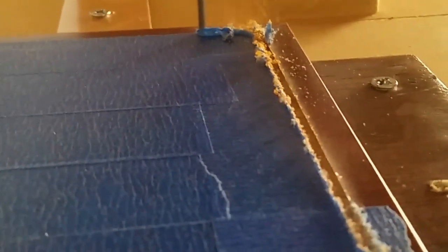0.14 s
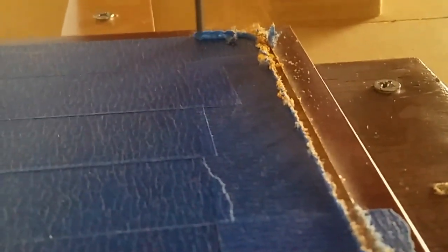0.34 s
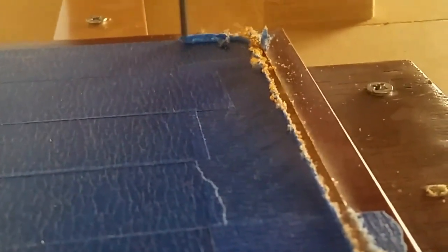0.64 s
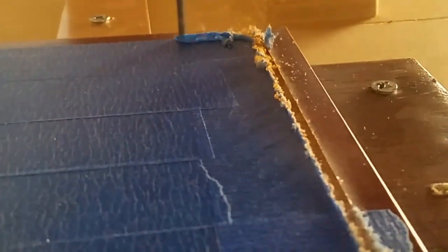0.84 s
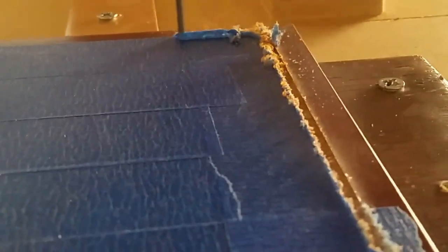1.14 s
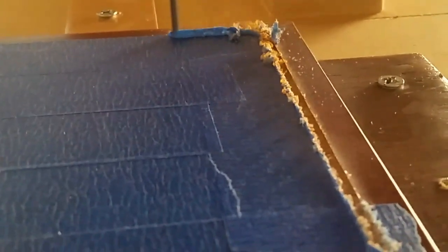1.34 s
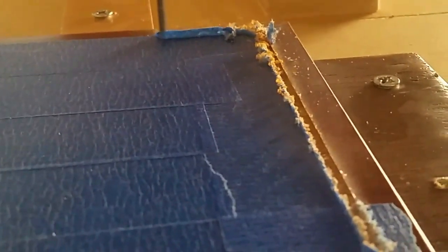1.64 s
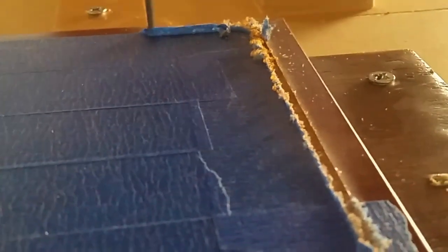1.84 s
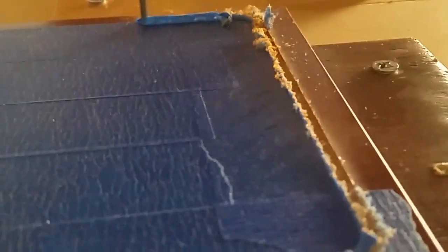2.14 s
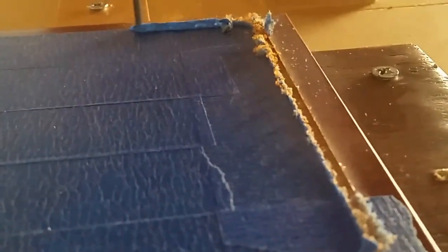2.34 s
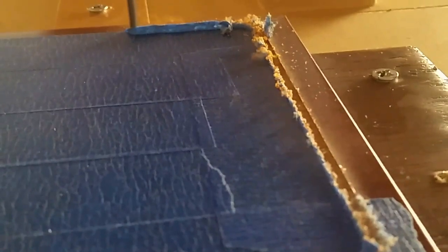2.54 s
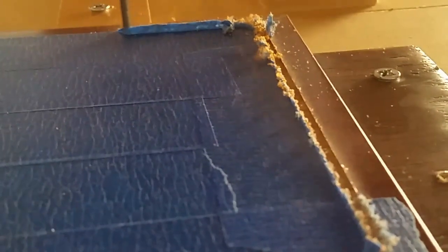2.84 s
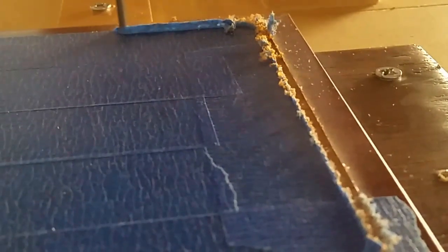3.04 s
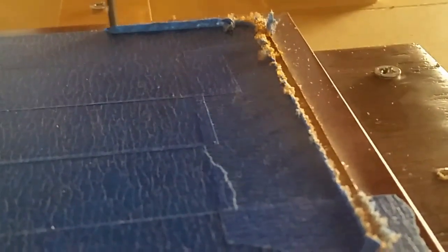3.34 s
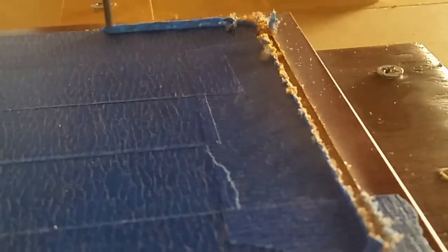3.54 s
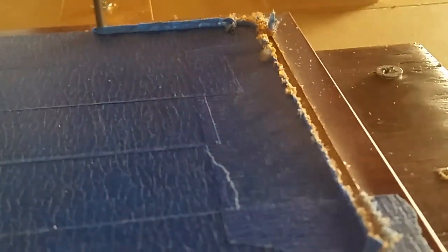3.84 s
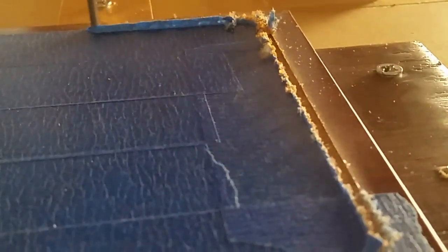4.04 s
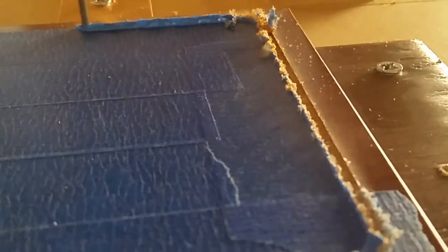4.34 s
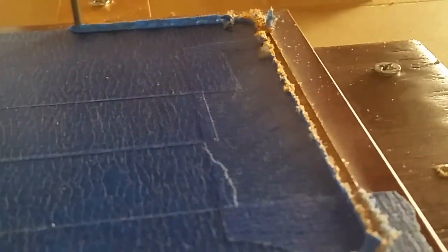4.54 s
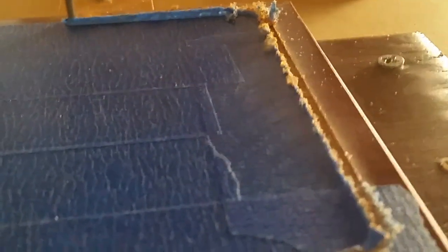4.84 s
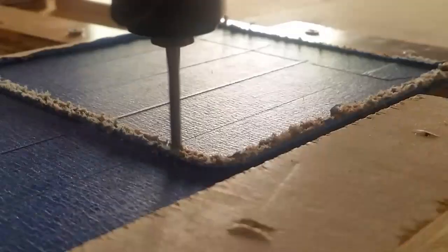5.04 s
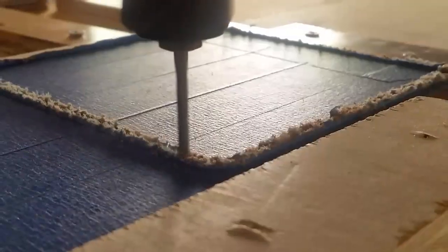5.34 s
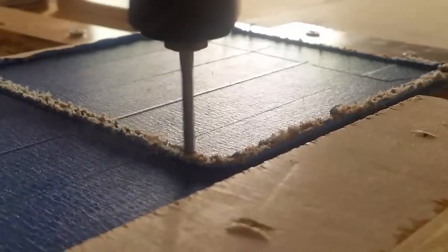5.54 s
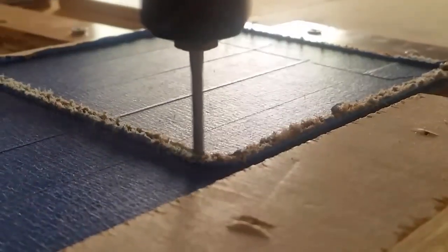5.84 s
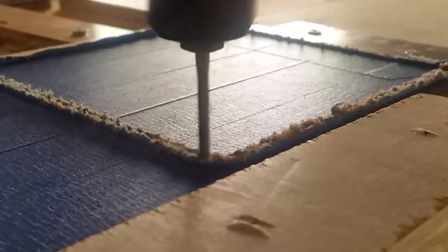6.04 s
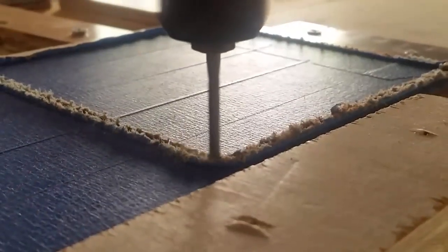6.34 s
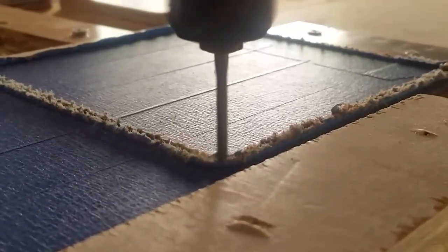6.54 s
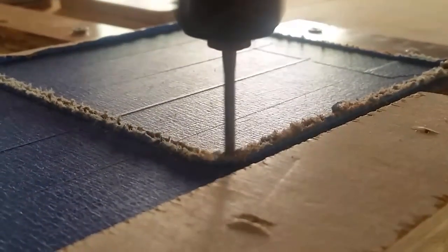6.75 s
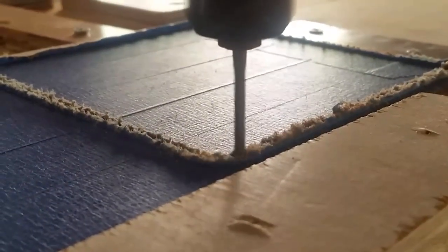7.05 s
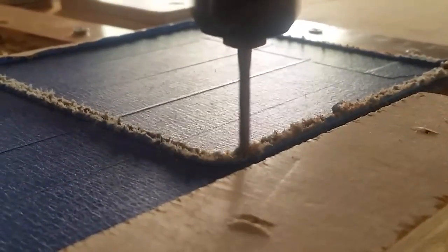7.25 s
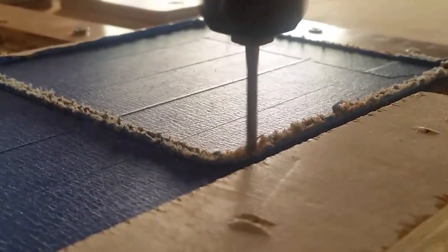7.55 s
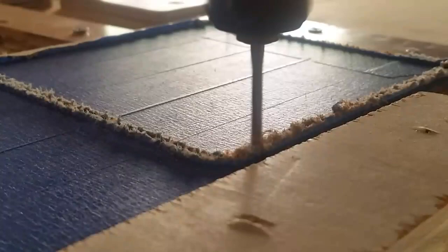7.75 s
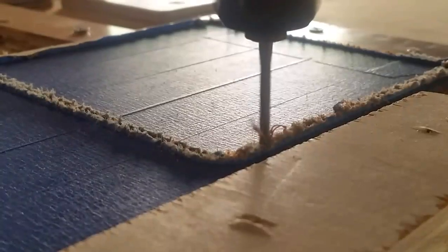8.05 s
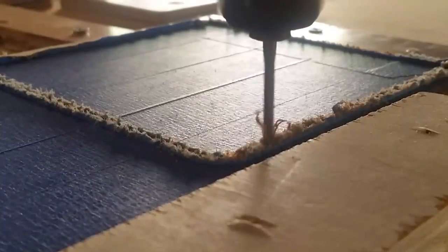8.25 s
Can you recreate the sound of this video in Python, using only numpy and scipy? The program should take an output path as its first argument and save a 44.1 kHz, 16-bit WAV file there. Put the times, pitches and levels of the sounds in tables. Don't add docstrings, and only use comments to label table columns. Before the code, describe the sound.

From 0 s a router spindle runs at full speed close to the microphone, a steady, dense buzzing whine with a low fundamental around 435 Hz, a strong octave above it and many higher tones up to a thin whine near 9.5 kHz. Broad fan air and chip hiss surround it, with narrow singing bearing tones. The cutter shank chatters brightly around 6.5 to 7 kHz, sinks near 1.4 s and peaks again around 2.2 s. From about 1.1 s a rough, shrill squeal near 7.3 kHz grows and flutters in bursts. At 4.97 s everything stops dead. Silence lasts until about 5.35 s, then the machine fades in by 5.7 s, further off, with weaker whine and chatter, airy hiss and no squeal. A faint low hum swells at 6.2 s; dull bench thuds come at 8.05 s and, strongest, at 8.2 s, the whine continuing to the end.

```python
import sys
import numpy as np
from scipy import signal
from scipy.fft import rfft, irfft
from scipy.io import wavfile
from scipy.ndimage import uniform_filter1d

SR = 44100
rng = np.random.default_rng(int(sys.argv[2]) if len(sys.argv) > 2 else 0)


def dump_mix(stems):
    frames = np.atleast_2d(stems).T
    limited = np.clip(frames, -1, 1)
    pcm = np.round(limited * 32767).astype(np.int16)
    wavfile.write(sys.argv[1], SR, pcm)


def linear_from_db(decibels):
    return 10 ** (np.asarray(decibels, float) / 20)


N = 369999
TIME = np.arange(N) / SR
CUT_S = 4.97164


def unit(x):
    return x / np.sqrt(np.mean(x ** 2))


def walk(rate):
    hold = max(int(SR / rate), 2)
    steps = rng.standard_normal(N // hold + 2)
    joined = np.interp(np.arange(N) / hold, np.arange(len(steps)), steps)
    return unit(uniform_filter1d(joined, hold))


def read(table):
    s, *columns = np.transpose(table)
    return [np.interp(TIME, s, column) for column in columns]


def along(levels_db, pass_s):
    return np.interp(TIME, np.linspace(*pass_s, len(levels_db)), levels_db)


def turns(hz):
    return 2 * np.pi * np.cumsum(hz) / SR


def slow_noise(width_hz):
    pole = np.exp(-np.pi * width_hz / SR)
    noise = rng.standard_normal(N) + 1j * rng.standard_normal(N)
    return signal.lfilter([1], np.poly([pole, pole]), noise)


def narrow(phase, width_hz):
    return unit(np.real(slow_noise(1.55 * width_hz) * np.exp(1j * phase)))


def air(spectrum, body, flutter_db):
    hz = np.fft.rfftfreq(N, 1 / SR) + 1
    table_hz, table_db = np.transpose(spectrum)
    colour = rfft(rng.standard_normal(N)) * linear_from_db(np.interp(np.log(hz), np.log(table_hz), table_db))
    body_db = 0
    for centre_hz, width_hz, db in body:
        body_db = body_db + db * np.exp(-(2 * (hz - centre_hz) / width_hz) ** 2)
    colour *= linear_from_db(body_db)
    colour /= np.std(irfft(colour * (hz > 10500) * (hz < 15500), N))
    out = 0
    for octave in range(4, 15):
        share = np.clip(1 - abs(np.clip(np.log2(hz), 4, 14) - octave), 0, 1)
        out = out + irfft(colour * share, N) * linear_from_db(flutter_db * (walk(3.19) + walk(11)))
    return out


def bumps():
    # middle_s, pitch_hz, length_cycles, peak_db
    knocks = [
        (6.228, 174, 7, -29),
        (8.06, 130, 1.3, -27),
        (8.05, 260, 1.5, -29),
        (8.224, 220, 1.4, -23),
    ]
    out = 0
    for s, hz, cycles, db in knocks:
        swell = np.exp(-((TIME - s) * hz / cycles * 2) ** 2)
        out = out + linear_from_db(db) * swell * np.sin(2 * np.pi * hz * TIME)
    return out


def ball_bearing(shaft, lines):
    return sum(linear_from_db(db) * narrow(k * shaft, width_hz) for k, width_hz, db in lines)


def shank_chatter(shaft, ring_hz, ring_db):
    return linear_from_db(ring_db) * narrow(turns(ring_hz + 60), 560) * (1 + 0.16 * np.cos(shaft))


def other_orders(shaft, orders, pass_s):
    out = 0
    for k, *levels_db in orders:
        out = out + linear_from_db(along(levels_db, pass_s) + .5 + 1.5 * walk(9)) * np.sin(k * shaft + k * k)
    return np.sqrt(2) * out


def whine(shaft, levels, pass_s):
    null_s, null_half_s, null_db = .72, .55, -16
    null = null_db * np.exp(-((TIME - null_s) / null_half_s) ** 2)
    out = 0
    for k, levels_db in zip((1, 2, 3, 22), levels):
        db = along(levels_db, pass_s) + (k > 3) * null + .5 * walk(9)
        out = out + linear_from_db(db) * np.sin(k * shaft + k * k)
    return np.sqrt(2) * out


def squeal(shaft):
    # offset_shaft_multiples, start_db, midway_db, end_db
    sidebands = [(-2, 2, -12, -12), (-1, 3, -7, -4), (0, -6, 1, -.5), (.53, -14, -4, -9), (2, -9, -8, -7),
                 (4, -18, -17, -16), (7, -19, -15, -15), (8, -16, -13, -13), (9, -18, -15, -16),
                 (17.2, -16, -13, -13)]
    pitch_hz, wander_hz = 7288, 20
    level_db, early_db, rise_db_per_s, burst_db = -29, -10.5, 1.1, 2.5
    sets_in_s, grows_s = 1.1, 1
    drift = slow_noise(65)
    pitch = pitch_hz + wander_hz * walk(3) + 28 * walk(16)
    tone = (.95 + .85 * drift / np.std(drift)) * np.exp(1j * turns(pitch))
    sides = 0
    for k, *levels_db in sidebands:
        sides = sides + linear_from_db(along(levels_db, (0, CUT_S))) * np.exp(1j * k * shaft)
    grown = np.clip((TIME - sets_in_s) / grows_s, 0, 1)
    later = np.maximum(TIME - sets_in_s - grows_s, 0)
    db = level_db + early_db * (1 - grown) + rise_db_per_s * later + burst_db * walk(9)
    return linear_from_db(db) * np.real(tone * sides)


def spindle(speed, whine_levels, curve, orders, bearing, spectrum, body, squeals):
    air_db, ring_hz, ring_db = read(curve)
    shaft = turns(read(speed)[0] + .08 * walk(12))
    pass_s = speed[0][0], speed[-1][0]
    hiss = linear_from_db(air_db) * (1 + 0.032 * np.cos(shaft)) * air(spectrum, body, flutter_db=0.44)
    balls = ball_bearing(shaft, bearing)
    ring = shank_chatter(shaft, ring_hz, ring_db)
    tones = other_orders(shaft, orders, pass_s) + whine(shaft, whine_levels, pass_s)
    return hiss + balls + ring + tones + squeals * squeal(shaft)


def microphone(x, drive, makeup_db):
    return linear_from_db(makeup_db) * np.tanh(drive * x) / drive


def far_position():
    # start_s, speed_hz
    speed = [(5.55, 435.45), (6.15, 435.4), (6.7, 436.3), (7.2, 436.68), (7.6, 436.55), (8.35, 436.13)]
    # start_db, midway_db, end_db
    levels = [(-29, -31.5, -31), (-30.5, -32, -34.6), (-35, -32.5, -32), (-40.3, -36.5, -37)]
    # start_s, air_db, chatter_hz, chatter_db
    curve = [
        (5.5, -29, 6760, -45.5),
        (5.8, -31, 6770, -45.5),
        (7.83, -31.5, 7040, -50),
        (8.39, -31.5, 6930, -46.5),
    ]
    # shaft_multiple, start_db, end_db
    orders = [(4, -43, -46), (5, -38.5, -36), (6, -54, -48), (7, -47, -45), (8, -52.5, -46), (9, -47, -40),
              (10, -40, -43), (11, -48, -55), (12, -52, -52), (13, -47.5, -43), (14, -45, -45),
              (15, -38, -41.5), (16, -44, -41.5), (17, -54, -43), (18, -51, -51), (19, -55, -57),
              (20, -60, -54), (23, -51, -51), (27, -54, -48), (28, -54, -51)]
    # shaft_multiple, width_hz, level_db
    bearing = [(9.73, 10, -50), (10.28, 10, -50), (12.28, 10, -51), (12.73, 10, -52), (14.73, 10, -53),
               (18.95, 30, -55), (21.73, 10, -58)]
    # pitch_hz, density_db_per_hz
    spectrum = [(25, -34), (60, -18), (130, -10), (600, -8), (1200, -6), (2000, -9.5), (4200, -11),
                (5500, -15.5), (7200, -11.5), (8000, -19.5), (8900, -23.5), (9700, -16.5), (12200, -15),
                (15700, -13.5)]
    # centre_hz, width_hz, level_db
    body = [(1340, 200, 0), (1850, 180, -0.5), (3420, 600, -1.2), (4300, 230, 1.5), (5270, 200, 3),
            (6600, 260, -4), (7400, 550, 1), (8160, 400, -1.5), (10300, 700, -1), (12400, 980, 2),
            (14100, 1300, -2), (15400, 500, -0.5)]
    sound = spindle(speed, levels, curve, orders, bearing, spectrum, body, squeals=0)
    return microphone(sound + bumps(), drive=3.24, makeup_db=0.57)


def near_position():
    # start_s, speed_hz
    speed = [(0.0, 435.6), (1.2, 435.3), (1.75, 434.95), (2.2, 435.35), (2.6, 435.02), (3.9, 434.8),
             (4.8, 433.76)]
    # start_db, midway_db, end_db
    levels = [(-27.5, -28, -26.2), (-20.5, -23, -22.5), (-28.5, -31.6, -31.5), (-42, -45, -46.5)]
    # start_s, air_db, chatter_hz, chatter_db
    curve = [
        (0.0, -30, 6600, -30),
        (0.362, -30, 6420, -29.5),
        (1.4, -29.5, 6823, -38.5),
        (2.2, -30.5, 7210, -29),
        (4.9, -30.5, 7190, -35.5),
    ]
    # shaft_multiple, start_db, end_db
    orders = [(4, -36.5, -38), (5, -34, -50), (6, -34, -41.5), (7, -34.5, -44), (8, -48.5, -43.5),
              (9, -45, -42), (10, -36, -35.5), (11, -49, -41), (12, -41.5, -50), (13, -46, -43),
              (14, -35, -43.5), (15, -32, -44), (16, -39, -48), (17, -47, -35), (20, -64, -52),
              (21, -58.5, -56.5), (23, -65, -59), (28, -55, -59)]
    # shaft_multiple, width_hz, level_db
    bearing = [(1.725, 8, -47), (3.277, 6, -45), (4.72, 8, -47), (6.87, 25, -43), (7.87, 25, -40),
               (8.87, 25, -41), (9.5, 15, -45), (9.87, 25, -45), (10.87, 25, -46), (13.85, 25, -41),
               (14.73, 10, -45), (19, 15, -49)]
    # pitch_hz, density_db_per_hz
    spectrum = [(25, -33), (60, -19.5), (130, -10.5), (420, -10), (1050, -4), (1700, -8.5), (4500, -11.5),
                (5100, -5.5), (5500, -9), (7200, -5), (8800, -15.5), (10000, -27), (10700, -16.5),
                (15700, -15.5)]
    # centre_hz, width_hz, level_db
    body = [(623, 110, 1), (804, 92, -4), (1363, 130, -2), (1584, 280, 0.5), (1980, 180, 1.5),
            (2330, 190, -1), (4120, 460, 2.5), (5270, 310, -4), (5650, 140, 0), (5800, 120, -4),
            (7980, 300, -0.5), (8760, 520, -4.5), (9940, 340, 6.5), (14800, 400, 2.5)]
    sound = spindle(speed, levels, curve, orders, bearing, spectrum, body, squeals=0.68)
    return microphone(sound, drive=2.16, makeup_db=0.86)


def scene():
    fade_from_s, fade_to_s = 5.348, 5.68
    fade = np.clip((TIME - fade_from_s) / (fade_to_s - fade_from_s), 0, 1)
    mono = far_position() * fade + near_position() * (TIME < CUT_S)
    return np.tile(mono, (2, 1))


HALF = 1024
WINDOW = np.sin(np.pi * (np.arange(2 * HALF) + .5) / (2 * HALF))


def treble_gaps(mono):
    # start_s, end_s, low_hz, high_hz, count
    gaps = [(.5, 4.9, 9650, 10400, 24), (0, 4.3, 11100, 11700, 5), (.8, 1.9, 8300, 9000, 5),
            (6.5, 8.3, 8270, 8960, 6)]
    mono, hz = mono.copy(), np.fft.rfftfreq(2 * HALF, 1 / SR)
    for start, end, low_hz, high_hz, count in gaps:
        for s in rng.uniform(start, end, count):
            part = slice(int(s * SR), int(s * SR) + 2 * HALF)
            band = irfft(rfft(mono[part]) * (hz > low_hz) * (hz < high_hz))
            mono[part] -= .8 * WINDOW ** 2 * band
    return mono


def side_grains(mono):
    # start_s, end_s, count
    grains = [(.1, .7, 4), (.7, 2.4, 34), (2.4, 4.9, 19), (5.4, 5.9, 2), (5.9, 6.5, 12), (6.5, 8.3, 9)]
    band_edges = np.r_[196, 216, 240, 264, 292, 320:737:32]
    side, grid = np.zeros(N), 848
    for start, end, count in grains:
        for when, where, wide in rng.random((count, 3)):
            s = start + when * (end - start)
            middle = grid + HALF * round((s * SR - grid) / HALF)
            low = int(where ** .75 * (len(band_edges) - 1))
            edges = band_edges[min(low, len(band_edges) - 3):low + 3 + 2 * (wide < .15)]
            part = slice(middle - HALF, middle + HALF)
            bins = np.arange(edges[0], edges[-1])
            size = uniform_filter1d(abs(rfft(mono[part] * WINDOW)), size=30)[bins]
            size = size * rng.standard_normal(len(bins))
            places = np.arange(2 * HALF) + .5 + HALF / 2
            cosines = np.cos(np.pi / HALF * np.outer(places, bins + .5))
            side[part] += linear_from_db(1.5) * WINDOW * (cosines @ size) / HALF
    return side


def low_pass(x):
    return signal.sosfilt(signal.butter(12, 17070, fs=SR, output="sos"), x)


def record(dry):
    top_cut = signal.ellip(12, .1, 60, 15740, fs=SR, output="sos")
    mono = treble_gaps(signal.sosfiltfilt(top_cut, dry[0]))
    side = side_grains(mono)
    return low_pass(np.array([mono + side, mono - side]))


dry = scene()
out = record(dry)
dump_mix(out)
```